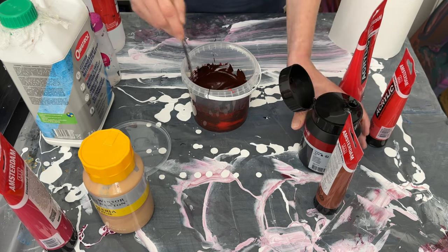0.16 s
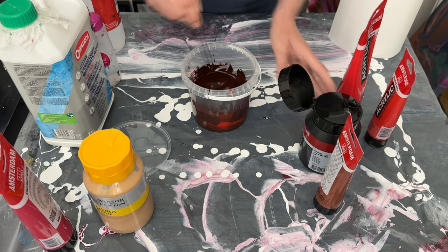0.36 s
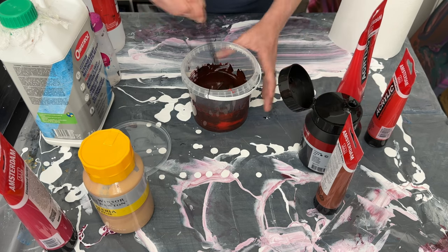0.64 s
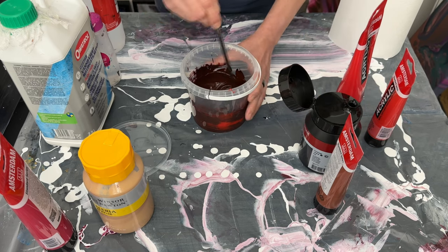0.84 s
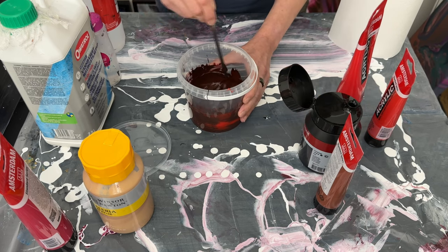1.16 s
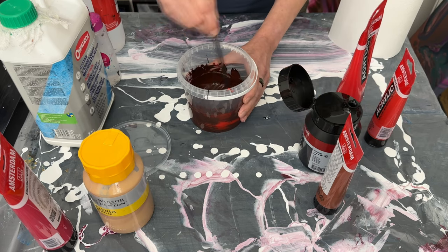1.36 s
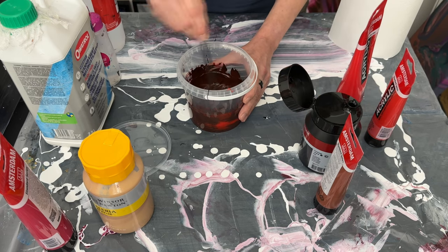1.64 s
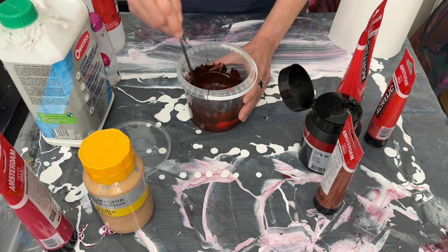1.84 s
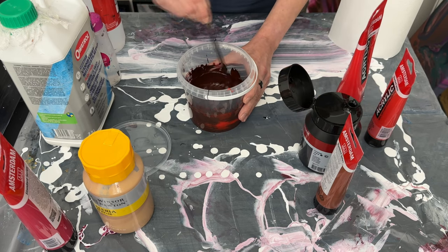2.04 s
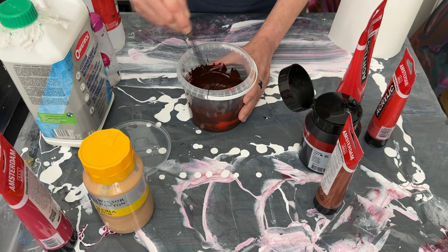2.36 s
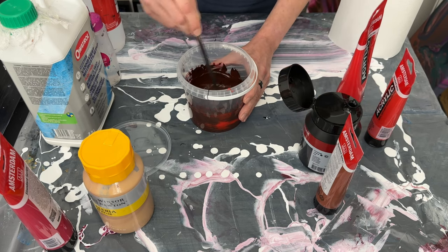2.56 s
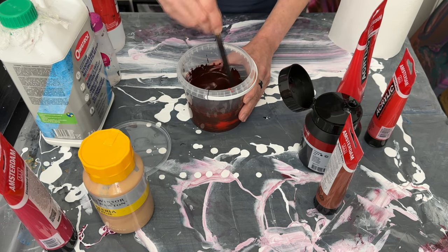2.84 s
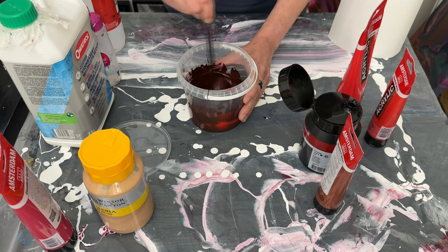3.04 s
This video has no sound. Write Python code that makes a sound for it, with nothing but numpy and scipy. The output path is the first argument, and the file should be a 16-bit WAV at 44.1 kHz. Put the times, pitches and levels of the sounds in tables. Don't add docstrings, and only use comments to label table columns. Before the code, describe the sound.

A stick stirs thick paint in a thin plastic tub, starting with a light tap and soft scrape, then uneven hollow knocks, chattering clicks, short rubs and faint wet fizz, recorded in close stereo in a quiet small room.

```python
import sys
import numpy as np
from scipy import signal
from scipy.fft import rfft, irfft, next_fast_len
from scipy.io import wavfile
from scipy.ndimage import map_coordinates

SR = 44100
rng = np.random.default_rng(int(sys.argv[2]) if len(sys.argv) > 2 else 0)


def how_loud(loudness_db):
    steps = np.asarray(loudness_db, float) / 20
    return 10 ** steps


def unload_audio(sound):
    columns = np.transpose(np.atleast_2d(sound))
    steps = np.round(np.clip(columns, -1, 1) * 32767)
    wavfile.write(sys.argv[1], SR, steps.astype(np.int16))


N = 141120


def unit(x):
    return x / np.sqrt(np.mean(x ** 2) + 1e-20)


def along(points, hz):
    f, value = np.transpose(points)
    return np.interp(np.log(hz + 1), np.log(f + 1), value)


def shut(points):
    return lambda hz: how_loud(along(points, hz)) * (hz > points[0][0]) * (hz < points[-1][0])


def wobble(rate):
    knots = rng.standard_normal(int(N * rate / SR) + 4)
    return map_coordinates(knots, [np.arange(N) * rate / SR])


def filtered(x, response):
    m = next_fast_len(N + SR // 2)
    return irfft(rfft(x, m) * response(np.fft.rfftfreq(m, 1 / SR)), m)[..., :N]


def place(track, time_s, sound):
    track[..., round(time_s * SR):][..., :sound.shape[-1]] += sound


def ring(modes, count, lift_db=0, slow=1):
    hz, db, t60 = np.transpose(modes)[:, :, None]
    t = np.arange(SR // 12) / SR
    luck = rng.standard_normal((count, 3, len(modes), 1))
    level = how_loud(2.5 * luck[:, 0] + lift_db) * how_loud(db - 60 * t / t60)
    pitch = hz * (1 + 0.0086 * luck[:, 1])
    waves = level * np.sin(2 * np.pi * (pitch * t + 0.12 * luck[:, 2]))
    swell = (1 - np.exp(-t * hz / (slow * 0.41))) ** 2
    return (waves * swell).sum(1)


# (time [s], level [dB], brightness [dB], table thud [dB], strongest wall pitch [octaves over
# FOCUS_HZ])
BLOWS = [(0.177, -28, -24, -18, -0.2), (0.358, -37, -11, -21, 0.08), (0.371, -41, -32, -9.5, -0.68),
         (0.4957, -45, -8, -30, -0.042), (0.5196, -31, -15, -10.5, 0.0074),
         (0.734, -36.5, -17.5, -16.5, -0.25), (0.811, -44, -12, -7, -0.11),
         (0.846, -39.5, -21, -6.5, -0.27), (0.866, -41.5, -19, -21, .05),
         (0.922, -33, -10, -20, -0.06), (0.915, -32, -6, -16, 0.18), (0.93, -32.5, -7, -20.5, 0.73),
         (1.062, -49, -25, -28, 0.2), (1.117, -40.5, -15.5, -11, -0.51),
         (1.17, -42.5, -29, -26, 0.21), (1.194, -23.5, -10.5, -20, 0.34),
         (1.2035, -31, -16, -19.5, 0.27), (1.2135, -28, -17, -15, 0.76),
         (1.2195, -29.5, -35, -16.5, -.5), (1.333, -56.5, -0.5, 9.5, .05),
         (1.355, -42.5, -9, -12, 0.43), (1.39, -42.5, -40, -30, 0.16), (1.396, -47, -32, -20, .05),
         (1.475, -22, -11, -25.5, 0.38), (1.4838, -27.5, -8, -18, 0.28),
         (1.4946, -30.5, -24, -21, 0.22), (1.588, -35, -21, -13.5, 0.24),
         (1.607, -32.5, -15, -20, 0.093),
         (1.668, -41.5, -13, -12, -0.1), (1.797, -48, -3.5, -47, -0.1), (1.92, -30, -15, -15.5, 0.26),
               (1.9257, -34.5, -24, -12, 0.3), (1.9382, -29, -11, -13.5, -.05),
               (2.0677, -34, -11, -18, 0.1), (2.088, -40, -11, -11, 0.3), (2.12, -44, -26, -19, 0.6),
               (2.1566, -28.5, -23, -23, 0.18), (2.1885, -33, -14, -28, -0.7),
               (2.219, -37.5, -11, -5.5, -0.1), (2.229, -40, -20, -9, -0.3), (2.309, -25, -16, -19, -0.02),
               (2.319, -34.5, -11, -10, -0.4), (2.339, -37.5, -1, -19, -0.5),
               (2.3677, -25.5, -14, -22, 0.33), (2.38, -51, -15, -3, 0.5), (2.462, -31.5, -14, -18, 0.1),
               (2.572, -34.5, -28, -17, 0.13), (2.7104, -35.5, -19.5, -19, -0.12),
               (2.781, -38.5, -15, -12.5, -0.1), (2.804, -54, -7, 3, -.3), (2.8896, -37, -8.5, -24, 0.24),
               (2.959, -42.5, -8, -33, 0.24), (3.03, -54, -13, -29, -0.3), (3.1225, -58.5, -12, -23, -0.2),
               (3.147, -43.5, -21, -17.5, -0.15)]
# (frequency [Hz], level [dB], time to fade by 60 dB [s])
WALL_MODES = [(447, 7, 0.022), (529.7, 1.5, 0.043), (621, 3, 0.024), (680, 3, 0.037), (742.5, -0.5, 0.029),
              (849, 0.5, 0.023), (1002, -0.5, 0.024), (1144, -0.5, 0.03), (1245, -3.5, 0.023)]
RIM_MODES = [(1627, -4.5, 0.0077), (1960, 0, 0.02), (2437, -4, 0.018), (2980, -2.5, 0.0068),
             (3506, 3, 0.0029)]
TABLE_MODES = [(59.3, -8.5, 0.31), (138.3, -15.5, 0.11), (174.6, 1, 0.048), (220.7, -2, 0.061),
               (288.2, -2.5, 0.049)]
FOCUS_HZ, FOCUS_DB = 700, 7
SOFTEN, HARD_DB = 0.34, -24.5
CRACK_HZ, CRACK_WIDTH_HZ, CRACK_T60_S = 2070, 1520, 0.014
CHATTER_S, CHATTER_LOSS_DB = 0.0075, 12


def crack_colour(hz):
    band = 1j * hz * CRACK_WIDTH_HZ
    return (band / (CRACK_HZ ** 2 - hz * hz + band)) ** 2


def knocks():
    time_s, db, bright_db, thud_db, focus = np.transpose(BLOWS)[:, :, None]
    count, t = len(time_s), np.arange(SR // 12) / SR
    octaves = np.log2(np.transpose(WALL_MODES)[0] / FOCUS_HZ)
    lift_db = -FOCUS_DB * (octaves - focus)[..., None] ** 2
    slow = how_loud(SOFTEN * np.clip(HARD_DB - db, 0, 14))[..., None]
    wall = ring(WALL_MODES, count, lift_db, slow)
    rim = how_loud(bright_db + 6.5) * ring(RIM_MODES, count)
    table = how_loud(thud_db + 13.5) * ring(TABLE_MODES, count)
    blows = wall + rim + table
    crack_level = how_loud(bright_db + 26 - 60 * t / CRACK_T60_S) * (1 - np.exp(-t / 0.0021))
    cracks = crack_level * rng.standard_normal(blows.shape)
    flights = np.cumsum(CHATTER_S * rng.uniform(.6, 1.4, (count, 3)), axis=1)
    out = np.zeros((2, N + SR))
    for i in range(count):
        for bounce, late in enumerate(flights[i] - flights[i, 0]):
            level = how_loud(db[i] - 5.5 - CHATTER_LOSS_DB * bounce)
            place(out, time_s[i, 0] + late, level * np.array([blows[i], cracks[i]]))
    return out[0, :N] + filtered(out[1, :N], crack_colour)


# (time [s], level [dB], pitch [Hz])
TIP_TAPS = [(.003, -41.5, 1920), (.004, -45, 643), (1.588, -47, 2030), (2.362, -44, 1960),
            (0.3409, -38.5, 1960), (0.7208, -42.5, 2842), (0.7295, -39, 3820), (0.8144, -46, 3100),
            (1.1156, -35.5, 2910), (1.2139, -32, 4190), (1.438, -45.5, 4360), (1.7868, -44.5, 2390),
            (1.9052, -48, 3870), (2.0437, -52, 2100), (2.053, -44, 1950), (2.088, -36.5, 1980),
            (2.1884, -38.5, 3940), (2.3391, -31, 3570), (2.367, -33, 4330), (2.673, -46.5, 2000),
            (2.911, -31, 2650), (3.156, -47.5, 2470), (3.169, -51, 2880), (2.782, -41, 1940),
            (2.325, -36.5, 2580)]
TAP_CYCLES = 41.6


def taps():
    out, t = np.zeros(N + SR), np.arange(SR // 20) / SR
    for time_s, db, hz in TIP_TAPS:
        rough = sum(np.sin(2 * np.pi * (hz * r * t + rng.random())) for r in (.86, 1, 1.15)) / 2
        level = how_loud(db - 2 - 60 * t * hz / TAP_CYCLES) * (1 - np.exp(-t / 0.00016))
        place(out, time_s, level * rough)
    return out[:N]


# (time [s], level [dB])
PAINT_SNAPS = [(0.0194, -49), (0.09, -57), (0.166, -49), (0.1913, -44), (0.3376, -47.5), (0.7206, -47.5),
               (0.7286, -38.5), (0.8126, -48.5), (0.8652, -50), (1.1144, -44.5), (1.355, -42),
               (1.6511, -54), (1.8973, -39), (1.907, -39), (2.1924, -49), (2.217, -42), (2.2434, -47),
               (2.3363, -49), (2.367, -36), (2.381, -47), (2.7263, -49), (2.7665, -51), (2.817, -52),
               (2.9035, -49), (2.9334, -44.5), (3.1267, -49)]
# (frequency [Hz], level [dB])
WET_COLOUR = [(2500, -10.5), (6000, -3), (8200, -2), (10000, 3), (12000, -10.5), (13800, -2.5),
              (15500, -12)]
SNAP_T60_S = 0.019


def smacks():
    out, t = np.zeros(N + SR), np.arange(SR // 20) / SR
    for time_s, db in PAINT_SNAPS:
        place(out, time_s, how_loud(db - 9.5 - 60 * t / SNAP_T60_S) * rng.standard_normal(len(t)))
    return filtered(out[:N], lambda hz: 2 * how_loud(along(WET_COLOUR, hz)))


def grains(colour, flutter_db):
    slips = np.zeros(N)
    when, way, size = rng.random((1200 * N // SR, 3)).T
    slips[(when * N).astype(int)] = np.sign(way - .5) * how_loud(-6.5 * np.log(size + 0.013))
    mix = unit(slips) + rng.standard_normal(N)
    return unit(filtered(mix * how_loud(flutter_db * wobble(40.09)), colour))


STROKE_STARTS = [-.04, .72, .86, 1.19, 1.34, 1.47, 1.65, 1.77, 1.89, 2.18, 2.32, 2.64, 2.88, 3.115]
# (length [s], scrape level [dB], wet fizz level [dB])
STROKES = [(0.28, -61.5, -71.5), (0.09, -53, -94), (0.15, -63.5, -60.5), (0.068, -55, -59),
           (0.37, -59.5, -69), (0.041, -51.5, -80), (0.051, -61, -93), (0.066, -63.5, -79),
           (0.11, -62.5, -67), (0.062, -47.5, -69.5), (0.1, -49.5, -77), (0.055, -58.5, -63.5),
           (0.11, -53, -60.5), (0.34, -60.5, -76)]
STROKE_SHAPE = np.array([[0, .2, .6, 1], [0, 1, .7, 0]])
# (frequency [Hz], level [dB per Hz])
SCRAPE_COLOUR = [(150, -6), (450, -3.5), (720, 0.5), (1100, -3.5), (1550, -6.5), (2050, -5), (3200, -15),
                 (8000, -21)]


def drag():
    t, press = np.arange(N) / SR, np.zeros((2, N))
    shape_time, shape_press = np.array(STROKE_SHAPE)
    for start, (length, scrape_db, fizz_db) in zip(STROKE_STARTS, STROKES):
        stroke = np.interp(t, start + length * shape_time, shape_press)
        press += how_loud([[scrape_db], [fizz_db]]) * stroke
    scrape = grains(shut(SCRAPE_COLOUR), flutter_db=4.5)
    fizz = grains(lambda hz: how_loud(along(WET_COLOUR, hz)), flutter_db=6.5)
    return press[0] * scrape + press[1] * fizz


# (time [s], level [dB])
SWISH_LEVEL = [(0.0, -76), (0.19, -82), (0.3, -80), (0.54, -79.5), (0.76, -87), (0.93, -77), (1.06, -78),
               (1.18, -74.5), (1.31, -83.5), (1.43, -78), (1.6, -82), (1.97, -83.5), (2.29, -83),
               (2.43, -90), (2.67, -86), (2.87, -78), (3.2, -78)]
# (frequency [Hz], level [dB])
SWISH_COLOUR = [(8200, -4.5), (9800, 3), (11800, -4), (14000, 0), (15700, -3)]


def swish():
    noise = rng.standard_normal((2, N)) + 0.97 * rng.standard_normal(N)
    level_db = np.interp(np.arange(N) / SR, *np.transpose(SWISH_LEVEL)) + 2 * wobble(7.6)
    return how_loud(level_db + 2.0) * unit(filtered(noise, shut(SWISH_COLOUR)))


# (frequency [Hz], likeness [0 to 1])
ALIKE = [(50, 0.952), (300, 0.84), (700, 0.021), (1500, 0.54), (4000, 0.18), (10000, 0.23)]


def spread(hz):
    return np.arccos(np.clip(along(ALIKE, hz), -1, 1)) / 2


# (frequency [Hz], time to fade by 60 dB [s])
ROOM_FADE = [(100, 0.24), (1000, 0.26), (10000, 0.15)]
ROOM_GAP_S = .008
SHIFT_S, SHIFT_RATE = .0003, 30


def room(x):
    out, step = np.zeros((2, N + SR)), SR // 5
    for a in range(0, N, step):
        hz, t, z = signal.stft(rng.standard_normal((2, SR // 3)), SR, nperseg=256)
        turn = spread(hz)[:, None]
        mid, side = np.cos(turn) * z[0], np.sin(turn) * z[1]
        fade = how_loud(-60 * t / along(ROOM_FADE, hz)[:, None])
        tail = signal.istft(np.array([mid + side, mid - side]) * fade, SR, nperseg=256)[1]
        wet = signal.fftconvolve(x[None, a:a + step], tail / np.linalg.norm(tail[0]), axes=1)
        out[:, a + round(ROOM_GAP_S * SR):][:, :wet.shape[1]] += wet
    late = np.arange(N) + SHIFT_S * SR * wobble(SHIFT_RATE)
    return np.array([map_coordinates(channel, [late]) for channel in out])


def pair(spectrum):
    def colour(hz):
        return shut(spectrum)(hz) * np.array([np.cos(spread(hz)), np.sin(spread(hz))])
    mid, side = filtered(rng.standard_normal((2, N)), colour)
    return unit(np.array([mid + side, mid - side]))


# (frequency [Hz], level [dB per Hz])
TONE_COLOUR = [(90, 1), (500, -9), (1200, -12.5), (2500, -19), (4000, -22.5), (7200, -21.5), (8300, -40.5),
               (15800, -36.5)]


def room_tone():
    return filtered(how_loud(-62) * pair(TONE_COLOUR), lambda hz: 1.0 * (hz <= 8310))


# (frequency [Hz], level [dB per Hz])
RUMBLE_COLOUR = [(25, -45), (40, -6), (55, 0), (110, -16)]


def rumble():
    return how_loud(-61 - 3 * wobble(5.07)) * pair(RUMBLE_COLOUR)


# (frequency [Hz], phase [radians])
LEAD = [(300, 0.056), (720, 0.68), (1100, 0.64), (2000, 0.39), (3400, 1), (5000, 1.33), (8300, 2.3),
        (13000, 0.28)]
# (frequency [Hz], level [dB])
TILT = [(700, 1.3), (4400, 4), (12000, 1)]


def ports(hz):
    half = how_loud(along(TILT, hz) / 2) * np.exp(.5j * along(LEAD, hz))
    return np.array([half, 1 / half])


def scene():
    tub = knocks() + taps() + smacks() + drag()
    return filtered(tub, ports) + how_loud(-6) * room(tub) + swish() + room_tone() + rumble()


def top_cut(x):
    return signal.sosfilt(signal.butter(12, 16440, fs=SR, output="sos"), x)


def record(dry):
    mix = filtered(dry, lambda hz: (hz < 15790) * hz ** 4 / (hz ** 4 + 28.3 ** 4))
    return top_cut(mix)


dry = scene()
out = record(dry)
unload_audio(out)
```